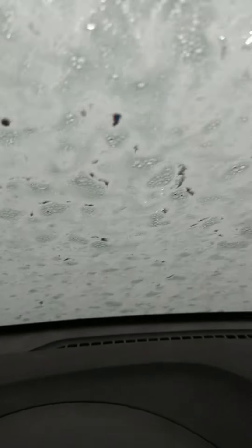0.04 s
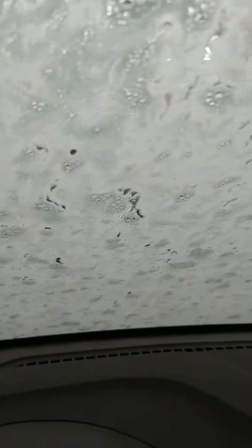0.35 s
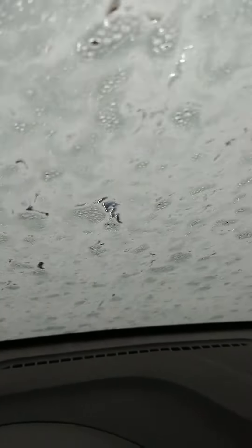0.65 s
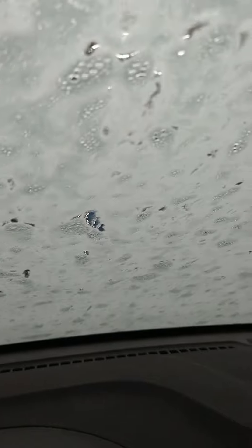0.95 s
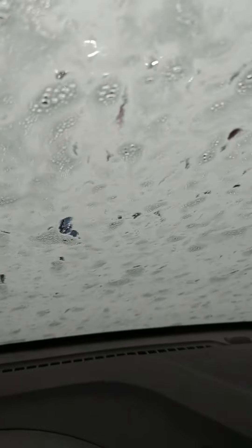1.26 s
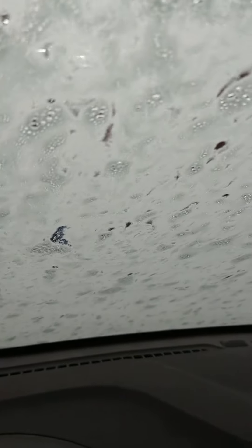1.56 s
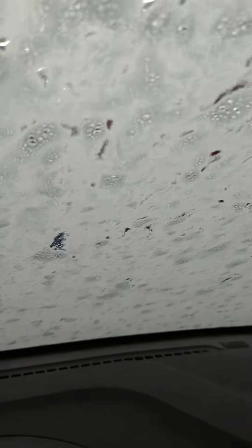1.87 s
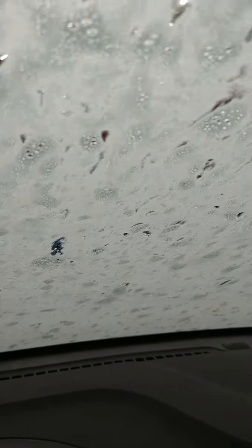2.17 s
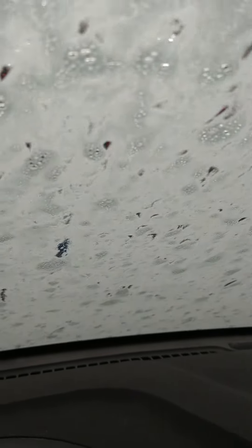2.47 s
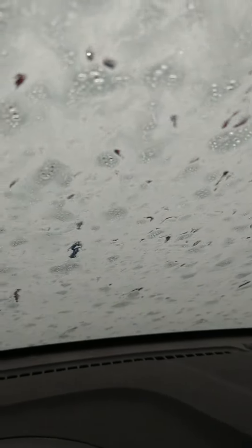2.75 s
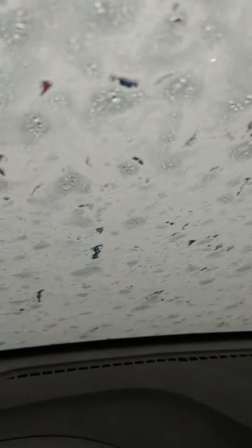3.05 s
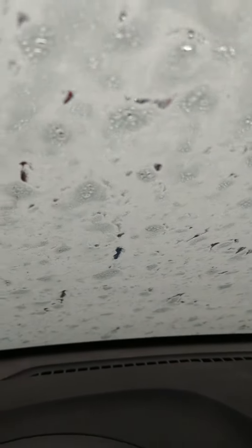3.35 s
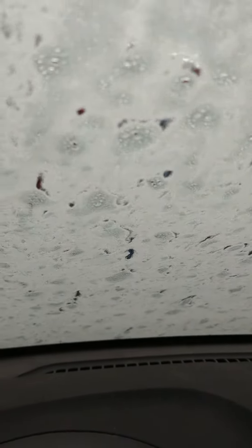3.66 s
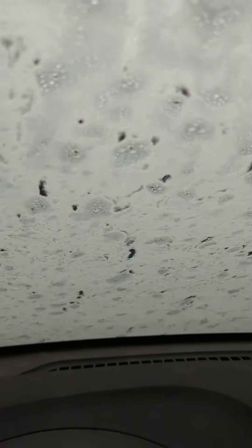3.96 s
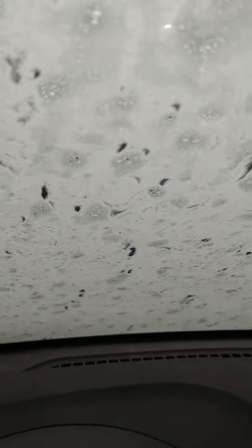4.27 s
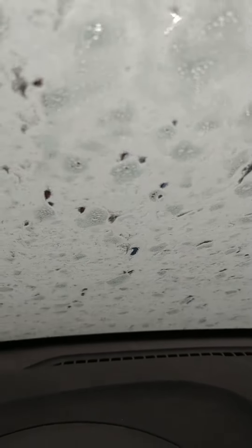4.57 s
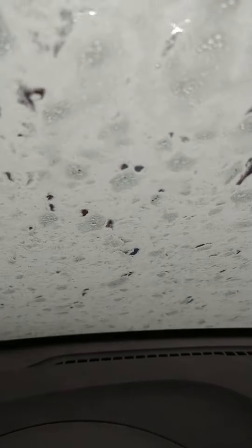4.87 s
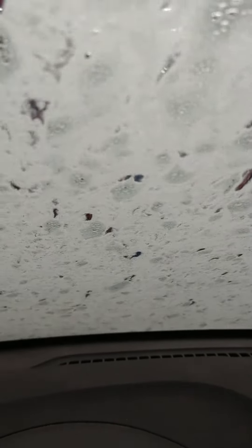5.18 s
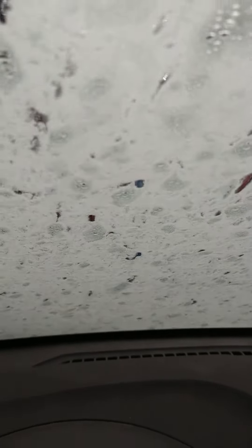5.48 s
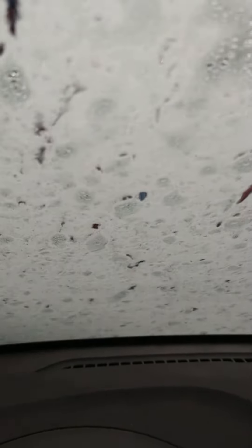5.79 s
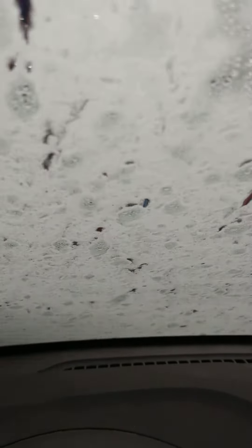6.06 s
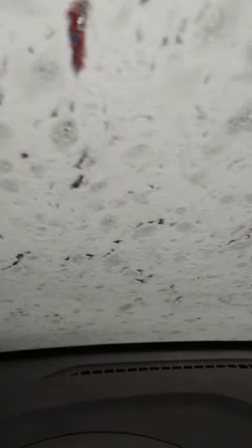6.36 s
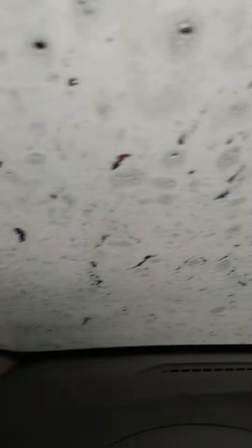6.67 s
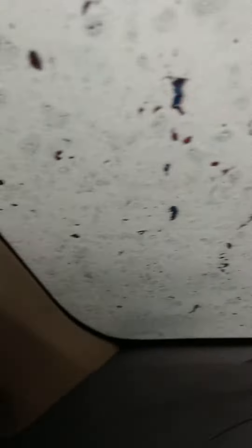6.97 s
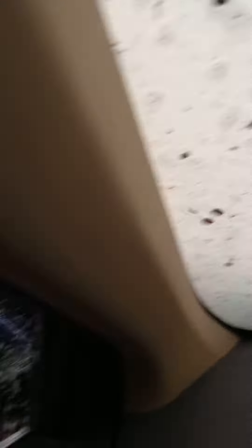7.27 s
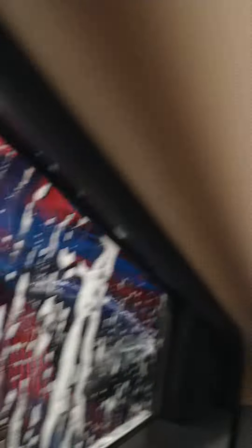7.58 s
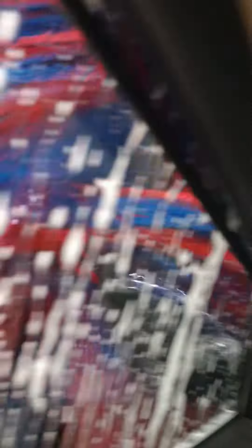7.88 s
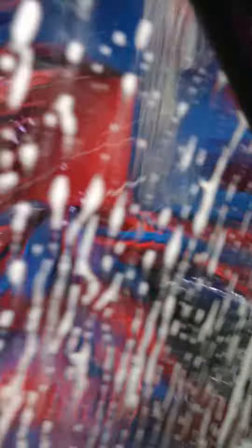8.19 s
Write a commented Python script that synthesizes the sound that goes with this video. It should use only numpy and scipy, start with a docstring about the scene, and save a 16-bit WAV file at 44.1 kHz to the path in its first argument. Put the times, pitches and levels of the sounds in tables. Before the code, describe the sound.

Heard from inside a car in a car wash, spray drums on the roof with a low rumble and washes over the body, fluttering like heavy rain for about eight seconds. Fine drops patter on the windshield over a light hiss. In the first two seconds, water slaps the hood with several hollow knocks and a few dull thumps. Gobs of foam splat on the glass, clustering around 3 seconds and again near 4. From about 4.5 to 6 seconds a jet sweeps across the windshield and bodywork, bringing thicker splats, crackling droplets, sharp taps and more thumps. The cabin's low boom swells from about 5.5 seconds and stays. The spray slackens for an instant here and there. Near 7.5 seconds the jet moves on to the side window with a hollow drumming, and a stronger knock lands just before 8 seconds.

```python
"""Inside a car in a car wash. Soapy spray drums on the roof and washes over the body; jets overhead
make the cabin boom. Passing jets ring the windshield, the bodywork and last the side window.
One pump feeds the spray, so wash, jets and patter flutter together. Gobs of foam splat on the
windshield, thickest as the jet sweeps it; slugs of water knock on the hood and thump the panels."""
import sys
import numpy as np
from scipy import signal
from scipy.fft import rfft, irfft, next_fast_len
from scipy.io import wavfile
from scipy.ndimage import map_coordinates

SR = 44100
rng = np.random.default_rng(int(sys.argv[2]) if len(sys.argv) > 2 else 0)


def transcribe(u):
    """Save the signal u as a 16-bit wav file named by the first command-line argument.

    u: samples, shape (n,) or (channels, n), limited to [-1, 1]; the rate is SR.
    q: integer samples, one column per channel.
    """
    v = np.clip(np.atleast_2d(u).T, -1, 1)
    q = np.round(v * 32767).astype(np.int16)
    wavfile.write(sys.argv[1], SR, q)


N = 362943

# spectra of water on metal and glass: (frequency [Hz], relative density [dB])
ROOF_SPECTRUM = [(25, -42), (40, -21), (60, -22.5), (76, -11), (92, -14), (106, -7), (130, -0.5), (170, -1),
                 (200, -4.5), (225, -7.5), (265, -15), (400, -31.5), (900, -73.5)]
WASH_SPECTRUM = [(120, -25.5), (230, -4), (290, 0.5), (360, 0), (435, 1), (485, -1.5), (540, -1),
                 (670, -6.5), (830, -8), (970, -10), (1150, -17), (1400, -17), (2200, -36), (4000, -61.5)]
PATTER_SPECTRUM = [(350, -22), (700, 4), (1050, 6.5), (1300, 0), (1650, 1.5), (2000, -3), (2350, -4.5),
                   (2750, -8), (3400, -20.5), (4500, -23), (8000, -48.5)]
MIST_SPECTRUM = [(1500, -24.5), (3000, 4.5), (3900, 1.5), (5000, -4.5), (6000, -3.5), (7200, -12),
                 (8000, -28)]
SPIT_SPECTRUM = [(1000, -7), (2500, 8.5), (3500, -4.5), (5200, -4.5), (6500, -8), (7400, -10.5),
                 (8000, -23.5)]
SPLASH_SPECTRUM = [(200, -15.5), (600, 10), (1200, 4.5), (2000, 2.5), (2900, 0.5), (3400, -2), (4400, -1.5),
                   (5500, -6.5), (6500, -11), (7300, -17), (8000, -32.5)]
# cabin and panel resonances: (frequency [Hz], width [Hz], relative level [dB])
CABIN_MODES = [(41.8, 6.1, -14), (64.5, 5.9, -3), (102.2, 12, 3), (130, 36, -6.5)]
FRONT_MODES = [(840, 58, 4), (1010, 180, 3.5), (1440, 110, -11.5), (1790, 130, -6), (2373, 140, -13.5),
               (2790, 220, -11)]
SWEEP_MODES = [(690, 60, 3.5), (860, 58, -7), (1180, 170, -6.5)]
BODY_MODES = [(205, 35, 7), (368, 89, 2), (483, 60, -7.5)]
SIDE_MODES = [(240, 53, 4), (372, 23, 8), (438, 35, 4.5), (602, 35, 0.5), (740, 25, -3), (860, 45, 0),
              (980, 70, -8), (1550, 160, -18), (2060, 170, -13), (2640, 300, -18)]
# windshield resonances: (frequency [Hz], width [Hz], mid-pane lift [dB], edge lift [dB])
PANE_MODES = [(3430, 260, -3, -4), (3720, 90, 2, 3), (3995, 50, 0, 6), (4400, 90, -1, 2),
              (4545, 90, -1, 9.5), (4830, 200, -2, -4), (5240, 110, 9, 4), (5520, 120, 2, 1),
              (5800, 180, 1, -4), (6327, 60, 0, 5), (6200, 2500, 2, -1)]
# hood resonances: (frequency [Hz], relative level [dB], t60 [s])
HOOD_MODES = [(380, -2.5, 0.13), (409, -4, .12), (441.4, -3, .16), (540, -11.5, 0.086), (722, -11.5, 0.11),
              (843, -13, 0.082), (950, -15, .06)]
# cabin boom and spray on each surface: (time [s], relative level [dB])
BOOM_LEVELS = [(0, -52), (2.2, -44), (3.4, -50), (5.1, -45.5), (5.55, -34.5), (6.15, -34.5), (6.55, -29.5),
               (7.22, -30), (7.33, -36.5), (8.23, -34)]
ROOF_LEVELS = [(0, -31), (1.8, -31.5), (2.2, -33.5), (2.9, -30.5), (3.9, -33), (4.6, -31.5), (5.4, -31.5),
               (6.1, -27), (6.7, -30.5), (7.26, -31.5), (7.33, -38), (7.43, -30.5), (8.23, -29.5)]
BODY_LEVELS = [(4.1, -57), (4.42, -35), (4.6, -31.5), (4.72, -39.5), (4.96, -33), (5.4, -34), (5.85, -39),
               (6.1, -40), (7.2, -39), (7.6, -55)]
SIDE_LEVELS = [(6.9, -60), (7.45, -42), (7.77, -40), (7.83, -33.5), (8.05, -34.5), (8.23, -36.5)]
PATTER_LEVELS = [(0, -49.5), (2.6, -45.5), (3.05, -46.5), (3.5, -47), (4.7, -46.5), (5.4, -45), (5.7, -51),
                 (6.5, -45.5), (7.1, -53.5), (7.6, -48), (8.23, -47.5)]
# jet passes: (closest time [s], relative level there [dB], rise [dB/s], fall [dB/s])
FRONT_JET = (4, -44.5, 5.5, 12)
SWEEP_JET = (5.1, -35, 24, 14)
MIST_JET = (6, -53.5, 1.02, 2.5)
# jet aim on the windshield: (time [s], mid-pane share [0-1], edge share [0-1])
JET_AIM = [(0, 0, 0.15), (2.3, 0.78, 0.062), (3, 0.66, 0), (3.9, 1, 0.13), (4.6, 1, 0.072),
           (5.3, 0.11, 0.46), (6.6, 0, .8), (8.23, 0.039, 0.46)]
# lulls in the spray: (time [s], depth [flutter rms], half length [s])
LULLS = [(2.735, 2.3, 0.011), (2.858, 1.5, .014), (3.068, 2.5, .015), (4.723, 6.2, 0.022),
         (4.842, 1.7, 0.014), (5.32, 1.5, 0.015), (5.753, 3.5, .022), (5.85, 3.4, .012), (6.17, 3.5, 0.034),
         (6.45, 5.5, .024), (6.675, 1.6, 0.018), (7.02, 2.6, .023)]
# big gobs on the windshield: (time [s], relative level [dB], spread time [s], tilt [dB/octave])
BIG_GOBS = [(1.236, -48.5, 0.006, -5), (1.33, -49, .004, 1), (1.457, -49, .005, -4), (1.565, -53, .011, 4),
            (1.848, -50, .0036, 1), (2.243, -46.5, .0045, 1), (2.812, -45.5, 0.01, -1),
            (2.873, -48.5, 0.0054, -3), (2.971, -51, .006, -9), (2.932, -46.5, .0055, -2),
            (2.987, -43.5, 0.005, -2), (3.008, -43.5, 0.0078, 1), (3.037, -41, 0.0059, -1.5),
            (3.095, -44.5, .005, -6), (3.119, -43, 0.005, -4), (3.19, -46.5, 0.0036, -8.5),
            (3.237, -44.5, 0.0082, -4), (3.323, -50.5, 0.015, -12), (3.368, -55, .008, -7),
            (3.61, -53, 0.015, -4), (3.71, -52.5, 0.015, -6), (3.931, -48, .011, 7),
            (4.052, -44.5, 0.0094, 3), (4.089, -40.5, .005, 3), (4.925, -47, .0086, -1),
            (5.014, -40, 0.0084, -3), (5.128, -45, 0.0051, 4), (5.194, -44, 0.009, 10),
            (5.262, -43.5, 0.011, 1), (5.39, -42, 0.01, -3.5), (5.413, -48, .007, 6),
            (5.447, -43.5, 0.021, -1.5), (5.535, -41.5, 0.013, 3), (5.573, -37.5, 0.006, 5),
            (5.664, -35, 0.011, -1), (5.712, -50, .008, 3), (5.776, -48, 0.0057, -6), (5.794, -45, .013, 0),
            (5.82, -37, 0.0045, 3.5), (5.885, -43.5, .016, -2), (5.935, -45.5, 0.0068, 1),
            (5.962, -46.5, 0.012, -4), (6.005, -50, 0.0072, -1), (6.068, -38, 0.011, -0.5),
            (6.229, -43, 0.0084, 3.5), (6.285, -48, 0.01, -5), (6.362, -49.5, 0.013, -0.5),
            (6.499, -47.5, .012, -2), (6.613, -46, 0.0088, -3), (6.775, -53.5, 0.0097, -4),
            (6.926, -52.5, .011, -5), (6.988, -45.5, 0.0036, -2), (7.207, -45.5, 0.0076, 5),
            (7.482, -47, 0.015, 1), (7.54, -52.5, .02, -4), (7.697, -52, .01, -9),
            (8.058, -48.5, .0069, 1.5)]
# water slaps on the hood: (time [s], relative level [dB])
KNOCKS = [(0.178, -23.5), (0.345, -26), (0.712, -27), (0.872, -24.5), (1.236, -30), (1.458, -27),
          (1.978, -24), (4.495, -25), (4.942, -25), (5.666, -30), (5.777, -28), (5.871, -25), (6.361, -23),
          (6.612, -26.5), (7.047, -22), (7.376, -25.5), (7.857, -17), (7.954, -27)]
# slugs of water on the panels: (time [s], peak [dB], pitch [Hz], t60 [s])
THUMPS = [(0.463, -17.5, 136.6, 0.39), (0.58, -20, 157, 0.086), (.652, -34, 720, 0.049),
          (0.76, -23.5, 162, 0.057), (1.783, -33, 1790, .033), (2.698, -28.5, 1510, .03),
          (2.953, -19, 147, 0.1), (3.365, -33, 2800, .035), (4.285, -25, 159, 0.04), (4.76, -24, 180, 0.14),
          (4.999, -19.5, 700, 0.038), (5.008, -22.5, 147, 0.063), (5.052, -26.5, 722, 0.15),
          (5.517, -21.5, 80, 0.15), (5.574, -27, 1264, 0.029), (5.663, -31.5, 1360, .04),
          (5.674, -22, 190, 0.087), (5.69, -25, 52.3, .25), (6.092, -19.5, 183, 0.068),
          (6.366, -17.5, 70.6, .16), (6.374, -17.5, 140, 0.08), (6.51, -20.5, 98, 0.19),
          (7.24, -23.5, 108, 0.12), (7.439, -22.5, 156, 0.14), (7.691, -25, 768, 0.05),
          (7.9, -21, 142, .06), (8.064, -26, 904, .07), (8.066, -31, 1950, 0.035)]

TIME_S = np.arange(N) / SR


def amp(db):
    """Decibels to gain."""
    return 10 ** (np.asarray(db) / 20)


def unit(x):
    """Scale to rms 1."""
    return x / np.sqrt(np.mean(x ** 2) + 1e-20)


def curves(rows):
    """Each column after the time, interpolated per sample."""
    times_s, *columns = np.transpose(rows)
    return [np.interp(TIME_S, times_s, column) for column in columns]


def wobble(rate_hz):
    """Smooth random curve, knots at rate_hz."""
    knots = rng.standard_normal(int(N * rate_hz / SR) + 4)
    return map_coordinates(knots, [TIME_S * rate_hz])


def filtered(x, response):
    """Zero-phase filter with gain response(hz)."""
    size = next_fast_len(len(x) + 8192)
    return irfft(rfft(x, size) * response(np.fft.rfftfreq(size, 1 / SR)), size)[:len(x)]


def coloured(x, spectrum):
    """x shaped by a spectrum, at rms 1."""
    points_hz, db = np.transpose(spectrum)
    return unit(filtered(x, lambda hz: amp(np.interp(np.log(hz + 1), np.log(points_hz), db))))


def resonant(x, modes):
    """x through steep-sided resonances, at rms 1."""
    def response(hz):
        return np.sqrt(sum(amp(db) ** 2 / (1 + ((hz - mode_hz) / width_hz) ** 2) ** 3
                           for mode_hz, width_hz, db in modes))
    return unit(filtered(x, response))


def through_pane(x):
    """The windshield favours narrow bands, depending on where it is struck."""
    mode_hz, width_hz, *lifts_db = np.transpose(PANE_MODES)[:, :, None]
    out = x
    for lift_db, share in zip(lifts_db, curves(JET_AIM)):
        def ringing(hz):
            peaks_db = lift_db / (1 + (2 * (hz - mode_hz) / width_hz) ** 2)
            return amp(peaks_db.sum(axis=0)) - 1
        out = out + share * filtered(x, ringing)
    return out


def drops(per_s, spread_db, t60_s, spots=10):
    """Many small drops and a few big ones land on spots, each with its own short ring; rms 1."""
    t = np.arange(SR // 12) / SR
    out = np.zeros(N)
    for _ in range(spots):
        when, size = rng.random((8192, 2))[:int(per_s * N / SR / spots)].T
        size_db = spread_db * np.minimum(-np.log(1 - size), 3.5)
        impacts = np.bincount((when * N).astype(int), amp(size_db), N)
        ring = rng.standard_normal(len(t)) * amp(-60 * t / t60_s)
        out += signal.oaconvolve(impacts, ring)[:N]
    return unit(out)


def passing_db(jet):
    """A jet swells as it nears and fades as it moves off."""
    closest_s, db, rise_db_per_s, fall_db_per_s = jet
    t = TIME_S - closest_s
    return db + np.where(t < 0, rise_db_per_s * t, -fall_db_per_s * t)


def lulls():
    """Depth of the spray's brief slackenings."""
    return sum(depth * np.exp(-((TIME_S - at_s) / half_s) ** 2) for at_s, depth, half_s in LULLS)


def roof_rumble(sag_db=0.9):
    """Jets overhead drum on the roof and set the cabin booming; both sag in the lulls."""
    boom_db, = curves(BOOM_LEVELS)
    roof_db, = curves(ROOF_LEVELS)
    boom = amp(boom_db) * resonant(rng.standard_normal(N), CABIN_MODES)
    drumming = amp(roof_db - 1) * coloured(rng.standard_normal(N), ROOF_SPECTRUM)
    return (boom + drumming) * amp(-sag_db * lulls())


def body_wash(surge, start_db=-34, ebb_db_per_s=0.22):
    """Big panels blur dense drops into a wash that ebbs as the car rolls on."""
    wash = coloured(drops(per_s=2400, spread_db=3, t60_s=0.041), WASH_SPECTRUM)
    return amp(start_db - ebb_db_per_s * TIME_S + 0.66 * surge) * wash


def jets(surge):
    """Each jet rings what it strikes: windshield, then bodywork, last the side window."""
    body_db, = curves(BODY_LEVELS)
    side_db, = curves(SIDE_LEVELS)
    front_hits = drops(per_s=900, spread_db=4.5, t60_s=0.024)
    front = amp(passing_db(FRONT_JET) + 1.9 * surge) * resonant(front_hits, FRONT_MODES)
    sweep = amp(passing_db(SWEEP_JET) + 1.2 * surge) * resonant(rng.standard_normal(N), SWEEP_MODES)
    body = amp(body_db + 0.55 * surge) * resonant(rng.standard_normal(N), BODY_MODES)
    side_hits = drops(per_s=400, spread_db=1.5, t60_s=0.034)
    side = amp(side_db + 1.1 * surge) * resonant(side_hits, SIDE_MODES)
    return front + sweep + body + side


def windshield_spray(surge, crossing_s=5.6, crackle_fade_db_per_s=10):
    """Drops patter over a mist that spits foam; stray droplets crackle as the jet crosses the pane."""
    patter_db, = curves(PATTER_LEVELS)
    mist_db = passing_db(MIST_JET)
    hits = drops(per_s=1300, spread_db=4, t60_s=0.064)
    patter = amp(patter_db + 3 + 1.04 * surge) * coloured(hits, PATTER_SPECTRUM)
    hiss = coloured(hits + 1.4 * rng.standard_normal(N), MIST_SPECTRUM)
    mist = amp(mist_db - 6.5 + 0.72 * surge) * hiss
    spit_db = np.minimum(1.7 * (mist_db + 57), 2) - 58  # louder in thicker mist, capped
    spits = amp(spit_db) * coloured(drops(per_s=55, spread_db=1.5, t60_s=0.07), SPIT_SPECTRUM)
    crackle_db = -48 - crackle_fade_db_per_s * np.abs(TIME_S - crossing_s)
    droplets = coloured(drops(per_s=700, spread_db=2.5, t60_s=0.04), SPLASH_SPECTRUM)
    crackle = amp(crackle_db + surge) * droplets
    return patter + mist / 2 + through_pane(mist / 2 + spits + crackle)


def small_gobs(per_s=8, spread_s=0.0055, scatter_db=3.5, max_tilt_db_per_oct=9):
    """Small gobs land unevenly and grow with the mist; rows as in BIG_GOBS."""
    jitter, size, colour = rng.random((256, 3))[:int(per_s * N / SR)].T
    onsets = ((np.arange(len(jitter)) + jitter) / len(jitter) * N).astype(int)
    mist_db = passing_db(MIST_JET)
    levels_db = -49.5 + 2.6 * (mist_db[onsets] - mist_db.max()) + scatter_db * (2 * size - 1)
    tilts = max_tilt_db_per_oct * (2 * colour - 1)
    return [(at_s, db, spread_s, tilt) for at_s, db, tilt in zip(onsets / SR, levels_db, tilts)]


def foam_splats(pivot_hz=3770, fizz_db=-18, fizz_fade_db_per_s=241.5):
    """Each gob spreads on the glass and bursts into droplets: quick swell, slower fade, foam fizz."""
    def octaves(hz):
        return np.log2(hz / pivot_hz + 1e-6).clip(-1, 1)
    out = np.zeros(N)
    droplets = coloured(drops(per_s=7000, spread_db=3.2, t60_s=0.005), SPLASH_SPECTRUM)
    for at_s, db, spread_s, tilt_db_per_oct in list(BIG_GOBS) + small_gobs():
        span = slice(max(int((at_s - 0.1) * SR), 0), int((at_s + 0.2) * SR))
        t = TIME_S[span] - at_s
        swell = 1 / np.sqrt(np.cosh(t / spread_s * np.where(t < 0, 5, 1.7)))
        fizz = (t > 0) * amp(fizz_db - fizz_fade_db_per_s * np.abs(t))
        burst = droplets[span] * np.hypot(swell, fizz)
        out[span] += amp(db + 5.5) * filtered(burst, lambda hz: amp(tilt_db_per_oct * octaves(hz)))
    return through_pane(out)


def hood_knocks(rise_s=0.003):
    """Water slaps the hood: a short hollow ring that varies from spot to spot."""
    out = np.zeros(N + SR)
    t = np.arange(SR // 4) / SR
    mode_hz, mode_db, t60_s = np.transpose(HOOD_MODES)[:, :, None]
    attack = 1 - np.exp(-t / rise_s)
    for at_s, db in KNOCKS:
        size, detune, phase = rng.standard_normal((3, len(HOOD_MODES), 1))
        decays = amp(mode_db + 2 * size - 60 * t / t60_s)
        modes = decays * np.sin(2 * np.pi * mode_hz * (1 + 0.015 * detune) * t + phase)
        out[round(at_s * SR):][:len(t)] += amp(db - 2) * modes.sum(axis=0) * attack
    return out[:N]


def panel_thumps(flatten_s=0.0017, mode_count=30):
    """A slug of water flattens on a panel, ringing a broad cluster of damped modes around one pitch."""
    out = np.zeros(N + SR)
    t = np.arange(SR // 3) / SR
    offset = np.linspace(-1, 1, mode_count)[:, None]
    weight = np.cos(np.pi / 2 * offset)  # middle modes loudest
    for at_s, peak_db, pitch_hz, t60_s in THUMPS:
        detune, phase = rng.random((2, mode_count, 1))
        mode_hz = pitch_hz * np.exp(0.35 * offset + 0.02 * detune)
        ring = (weight * np.sin(2 * np.pi * (mode_hz * t + phase))).sum(axis=0)
        attack = (1 - np.exp(-t / max(0.6 / pitch_hz, flatten_s))) ** 2
        thump = ring * amp(-60 * t / t60_s) * attack
        out[round(at_s * SR):][:len(t)] += amp(peak_db) * thump / np.abs(thump).max()
    return out[:N]


def scene():
    """Mono mix; wash, jets and windshield spray share one pump's flutter."""
    flutter = unit(0.16 * wobble(12) + wobble(25) + 0.46 * wobble(65))
    surge = flutter - lulls()
    water = roof_rumble() + body_wash(surge) + jets(surge) + windshield_spray(surge)
    return (water + foam_splats() + hood_knocks() + panel_thumps())[None]


def record(dry, low_cut_hz=46, top_hz=7950):
    """Thin the deepest bass; cut the treble steeply."""
    b, a = signal.butter(3, low_cut_hz, "highpass", fs=SR)
    thinned = signal.lfilter(b, a, dry[0])
    return filtered(thinned, lambda hz: 1 / np.sqrt(1 + (hz / top_hz) ** 120))[None]


dry = scene()
out = record(dry)
transcribe(out)
```